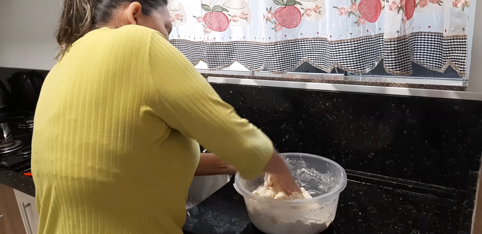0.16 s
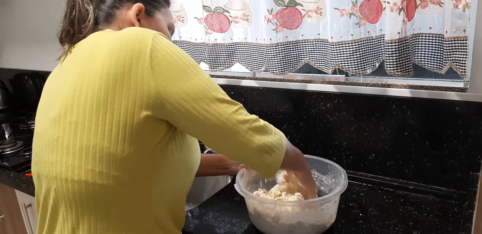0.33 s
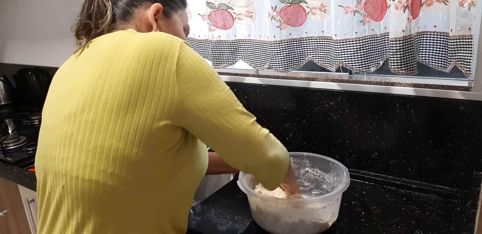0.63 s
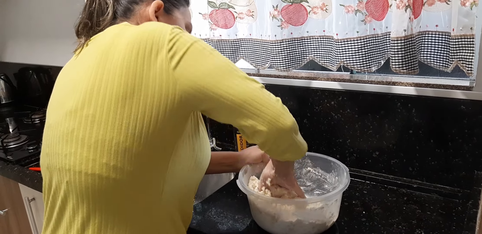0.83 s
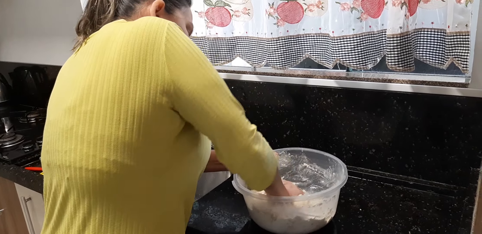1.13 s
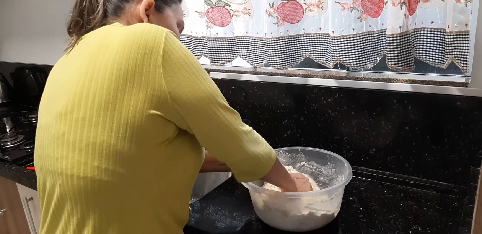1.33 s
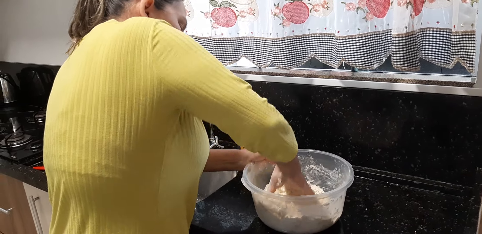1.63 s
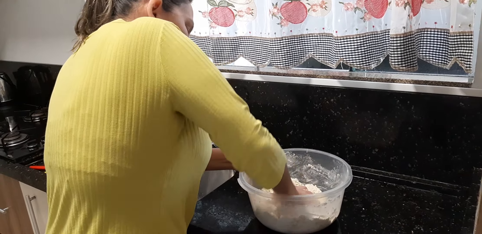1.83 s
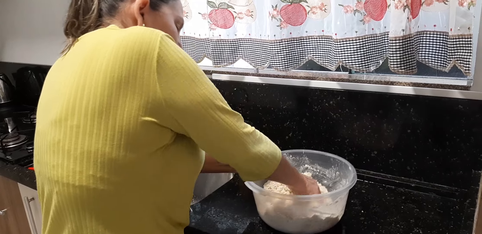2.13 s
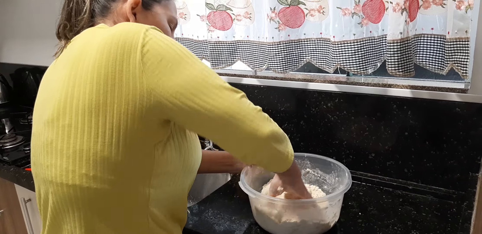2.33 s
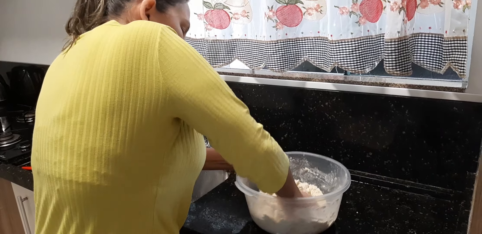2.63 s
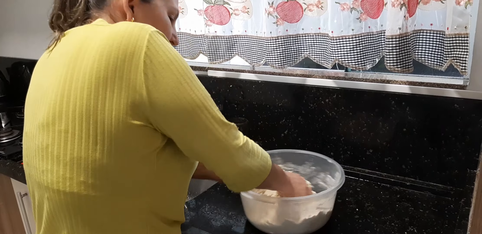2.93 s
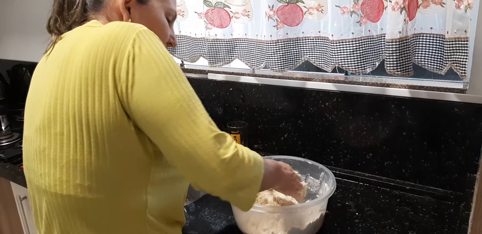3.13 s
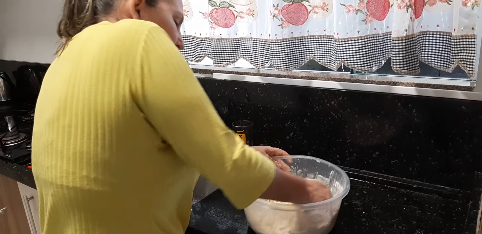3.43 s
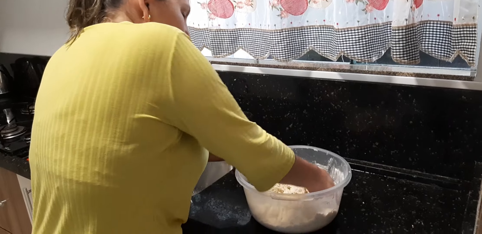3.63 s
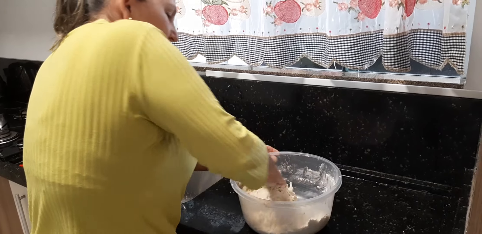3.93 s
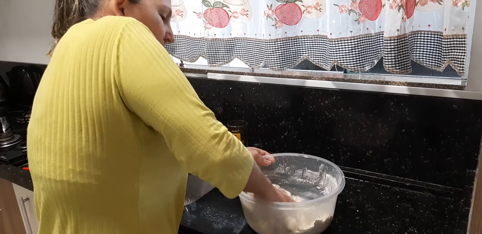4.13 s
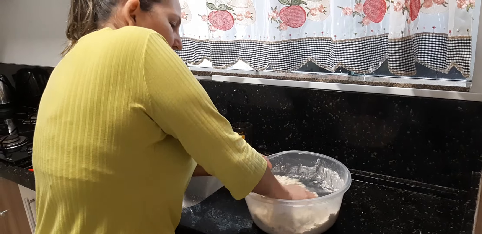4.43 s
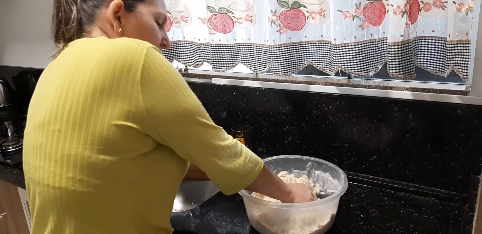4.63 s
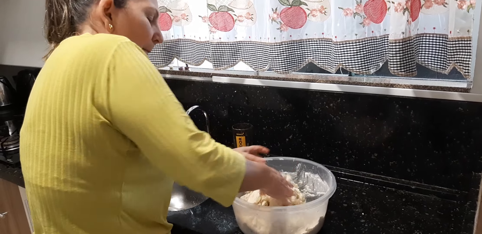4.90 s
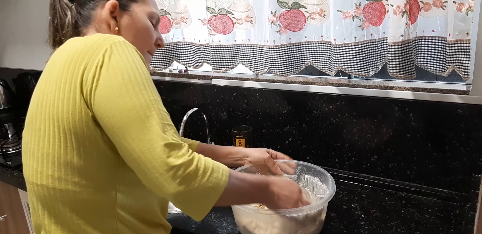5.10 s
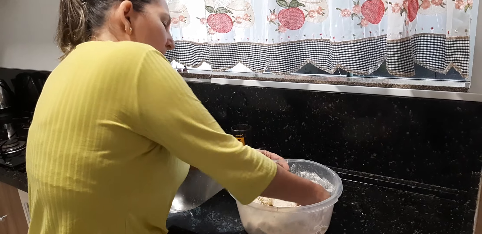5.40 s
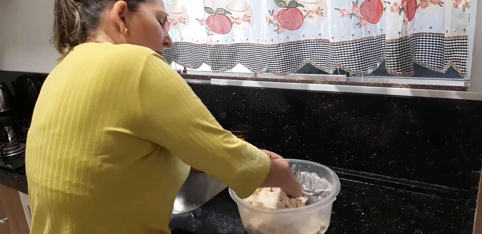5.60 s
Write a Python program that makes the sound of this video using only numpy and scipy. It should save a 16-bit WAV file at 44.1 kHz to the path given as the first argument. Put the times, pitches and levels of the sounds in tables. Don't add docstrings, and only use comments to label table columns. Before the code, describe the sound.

Close up, hands knead stiff, crumbly dough in a thin plastic bowl on a stone counter. A brief rub opens, then a small slap and tap at 0.4 s lead into a gritty push at 0.55 s. Around 1.0-1.2 s come firmer rasps, a few knuckle knocks and a dry snap. Lighter drags follow, with a push near 1.95 s and a soft dull slap at 2.5 s. A knock and scrape come at 3.0 s, then a heavy slap with clattering knocks, a thud and a tiny chink at 3.3 s. A strong push follows at 3.45-3.8 s, small taps at 4.0 s, a thud at 4.2 s and scraping to 4.9 s. The loudest knocks and bowl rock fall at 5.15-5.2 s, followed by dense crumbly rubs until about 5.65 s. Faint refrigerator hum and thin fan whine continue throughout, with short hard-walled kitchen reflections.

```python
import sys
import numpy as np
from scipy import signal
from scipy.io import wavfile
from scipy.ndimage import uniform_filter1d

SR = 44100
rng = np.random.default_rng(int(sys.argv[2]) if len(sys.argv) > 2 else 0)


def boost_factor(decibels):
    exponent = np.asarray(decibels, float) / 20
    return 10 ** exponent


def inscribe(sig):
    pcm = np.round(np.clip(np.atleast_2d(sig).T, -1, 1) * 32767)
    wavfile.write(sys.argv[1], SR, pcm.astype(np.int16))


N = 253883

# (frequency [Hz], density [dB per Hz])
RUB_COLOUR = [(300, -11), (480, -1), (750, -10), (1300, -3), (1900, -3), (2450, -1), (3000, -2.5),
              (4200, 1.5), (6700, -2), (7400, -6.5), (8200, -14.5), (9800, -15.5), (12000, -10),
              (13800, -12), (15400, -14)]
# (frequency [Hz], width [Hz], boost [dB])
BOWL_MODES = [(2365, 200, 1), (2500, 260, 2.5), (3640, 510, 1.5), (12160, 1100, 0), (7100, 330, 1.5),
              (1300, 160, 1)]
# (frequency [Hz], likeness [-1 to 1])
RUB_SAME = [(200, 1), (700, 0.88), (1200, 0.54), (1700, 0.), (2250, 0.83), (2800, 0.3), (3400, 0.18),
            (5000, 0), (15000, 0)]
# (frequency [Hz], left minus right [dB])
RUB_LEAN = [(300, -2.5), (700, 1.5), (1600, 3.5), (2400, -1.5), (3300, 2), (4100, 3.5), (5300, 1),
            (6300, 3.5), (7300, 9.5), (9000, 10.5), (11500, 8), (13200, 2.5), (15600, -1)]

# (start [s], length [s], force [dB], swell over the
# stroke [dB], floury hiss above force [dB])
STROKES = [(0.0, .01, -52.5, -0.5, -6), (.49, .05, -55.5, 3.5, -4), (0.548, .08, -49.5, -1, -1.5),
           (1.0, .07, -61, 4, -6), (1.081, .08, -55.5, 5.5, -0.5), (1.184, 0.087, -50, 3, -3.5),
           (1.908, 0.035, -59.5, 5, 2), (1.962, .11, -50.5, 1.5, -6), (2.854, 0.17, -52.5, 0, -7),
           (3.025, 0.066, -48.5, -0.5, -1.5), (3.443, 0.2, -51, 5.5, -3.5), (3.658, 0.14, -46, 1.5, -3),
           (4.348, 0.096, -50, 2.5, -3), (4.462, .18, -48, -2, -6), (5.205, 0.1, -48.5, 0.5, -6.5),
           (5.31, .08, -48.5, 3, -2.5), (5.394, 0.11, -46.5, -.5, 0.5), (5.556, 0.072, -45, 1, -3),
           (.1, .06, -61.5, -1.5, -11), (0.313, .02, -71, -4, 2), (0.439, .05, -54.5, -3, -8),
         (0.655, 0.097, -54.5, -2.5, -7), (.8, 0.056, -61, -3, -9), (.9, 0.25, -65, 3, -11),
         (1.36, .11, -56, 1.5, -9.5), (1.748, .13, -67.5, 2, -7), (2.14, .18, -57, -3.5, -8),
         (2.414, 0.12, -64, 0, -9), (2.688, 0.19, -54.5, 1, -9), (3.348, .085, -56.5, 5.5, -9),
         (3.89, .25, -52.5, -10, -7.5), (4.17, 0.19, -60, 2.5, -7), (4.668, .05, -52.5, -3, -8),
         (1.502, .1, -57.5, -9, -12), (3.122, 0.042, -51, -5.5, -5), (4.75, 0.074, -55, 1.5, -5),
         (4.848, .11, -56.5, 0, -9.5), (5.178, .025, -51, 3.5, -9.5)]
# (time [s], flexing [dB])
SLAPS = [
    (.39, -58.5),
    (2.532, -62.5),
    (3.311, -53.5),
    (3.33, -52.5),
    (5.148, -50),
]
# (time [s], level [dB])
LEAN_ON_WALL = [(0, -0.5), (.3, 1.5), (.42, 0.5), (.6, -1), (.72, -4), (.85, 1.5), (1.0, -2.5), (1.3, 2.5),
                (1.7, -1), (2.1, 0.5), (2.7, 0.5), (3.2, -0.5), (3.4, 2.5), (3.75, 0.5), (4.2, 3),
                (4.6, -0.5), (5.3, 0.5), (5.76, -.5)]

# (time [s], peak [dB], lower mode [Hz], upper mode [Hz], upper mode above lower [dB])
KNOCKS = [(0.389, -44, 1410, 2460, -3), (0.4246, -52, 1240, 2530, 11), (1.001, -49, 1320, 2130, -2),
          (1.1332, -41, 1510, 2500, -10), (2.9989, -40, 1010, 2330, -2), (3.309, -48, 1300, 2420, -17),
          (3.313, -38, 1500, 2280, -6), (3.3164, -38.5, 1340, 2210, -16), (3.3254, -44, 1440, 1970, 12),
          (3.3302, -40.5, 1820, 2020, 10), (3.991, -52.5, 1370, 2330, 19), (.845, -50, 1410, 2400, 6),
          (4.0435, -50, 1300, 2350, 8), (4.049, -46, 1300, 2350, 6), (5.23, -47, 1400, 2270, 6),
          (4.7937, -44, 1470, 2430, 6), (5.1444, -34.5, 1580, 2350, 3), (5.1524, -41, 1640, 2020, 9),
          (5.1596, -36, 1080, 1960, 0), (5.169, -46, 1350, 1980, 10), (5.188, -37, 1300, 2010, 0.1)]
# (time [s], peak [dB])
SNAPS = [
    (0.4242, -44),
    (1.1332, -44),
    (3.3145, -43),
    (4.217, -51),
    (5.187, -48),
]
# (time [s], peak [dB], frequency [Hz])
THUDS = [
    (1.089, -50, 207),
    (2.533, -41, 334),
    (3.316, -39, 215),
    (4.214, -42, 380),
    (5.186, -35.5, 417),
]
# (time [s], peak [dB], frequency [Hz])
CHINKS = [
    (0.3062, -55, 4930),
    (0.3134, -57, 5000),
    (3.3164, -47.5, 4430),
    (3.3174, -52, 3660),
    (5.284, -46.5, 3690),
]

# (frequency [Hz], density [dB per Hz])
AIR_COLOUR = [(400, 8), (700, 7), (1500, -5.5), (2250, 6), (3100, -2), (5000, -1.5), (6800, -8),
              (7500, -24), (8200, -17), (10200, -15.5), (11300, -8.5), (12900, -5), (13300, -26),
              (15400, -16.5)]
# (frequency [Hz], density [dB per Hz])
RUMBLE_COLOUR = [(20, -40), (36, -32), (50, -10), (72, -6.5), (90, -7), (105, -29), (120, -0.5), (200, 1),
                 (310, 0.5), (450, -5), (600, -11.5), (750, -15.5), (950, -13.5)]
# (frequency [Hz], likeness [-1 to 1])
AIR_SAME = [(60, 0.74), (150, 0.97), (380, 0.82), (950, 0.28), (2380, -0.38), (5980, -0.68), (15000, 0.15)]
# (frequency [Hz], left minus right [dB])
AIR_LEAN = [(60, 3), (300, 0.5), (1100, 4), (2300, 3), (3200, 1), (4200, 12), (5100, -5), (6500, 2),
            (7300, -3), (8200, 1), (10300, 14), (11300, 12), (12600, 4), (13300, -3), (15600, -7)]
# (frequency [Hz], width [Hz], boost [dB])
LEFT_PORT_BUMPS = [(11170, 540, 7), (12950, 200, 4), (9300, 240, 6), (3720, 440, 11)]
# (frequency [Hz], wander [Hz], level [dB rms], unsteadiness [0-1])
FRIDGE_HUM = [(60.4, 14.5, -67, 0.93), (121, 27, -67.5, 0.54), (200.8, 5, -68, 0.69)]
# (frequency [Hz], wander [Hz], level [dB rms], unsteadiness [0-1])
FAN_WHINE = (3626, 6, -75, .35)
# (frequency [Hz], t60 [s])
KITCHEN_T60 = [(200, 0.44), (1000, 0.69), (4000, 0.26), (12000, 0.086)]

TOP_HZ, EDGE_HZ = 15500, 15740
AIR_DB, RUMBLE_DB = -66, -57
RISE_DB_PER_S, FALL_DB_PER_S, REST_DB, REST_HISS_DB = 244, 107, -71.5, -7
HISS_FADE_DB_PER_S = 33
FIRM_DB, RING_DB, RING_FOLLOWS, FLEX_DB, FLEX_FOLLOWS = -50, -4, 0.79, -6.5, 0.64
SLAP_RING_DB, SLAP_SCRAPE_DB = 1, -3
SLAP_RISE_DB_PER_S, SLAP_FALL_DB_PER_S = 2500, 150
CRACK_DB = -14


def evened(x):
    return x / np.sqrt(np.mean(x ** 2) + 1e-20)


def read(points, hz):
    f, value = np.transpose(points)
    return np.interp(np.log(np.minimum(hz, TOP_HZ) + 1), np.log(f + 1), value)


def bumps(peaks, hz):
    return sum(db / (1 + (2 * (hz - f) / width) ** 2) for f, width, db in peaks)


def patches(shape, wide, long):
    over_hz = uniform_filter1d(rng.standard_normal(shape), round(wide), 0)
    return evened(uniform_filter1d(over_hz, round(long), 1))


def two_ports(pair, hz, same, lean):
    likeness = np.clip(read(same, hz), -1, 1)[:, None]
    half_db = read(lean, hz)[:, None] / 2
    right = likeness * pair[0] + np.sqrt(1 - likeness ** 2) * pair[1]
    return np.array([pair[0] * boost_factor(half_db), right * boost_factor(-half_db)])


def stroke(now, start, length, force_db, swell_db, rise=RISE_DB_PER_S, fall=FALL_DB_PER_S):
    held = force_db + swell_db * np.clip((now - start) / max(length, 1e-3), 0, 1)
    return held - rise * np.maximum(start - now, 0) - fall * np.maximum(now - start - length, 0)


def hand(now):
    rows = np.array(STROKES)
    force = np.maximum(np.max([stroke(now, *row[:-1]) for row in rows], 0), REST_DB)
    hiss_fall = FALL_DB_PER_S + HISS_FADE_DB_PER_S
    dust = [stroke(now, *row[:-1], fall=hiss_fall) + row[-1] for row in rows]
    hiss = np.maximum(np.max(dust, 0), REST_DB + REST_HISS_DB)
    slaps = [stroke(now, s, 0, db, 0, SLAP_RISE_DB_PER_S, SLAP_FALL_DB_PER_S) for s, db in SLAPS]
    slap = np.max(slaps, 0)
    wall = FIRM_DB + np.interp(now, *np.transpose(LEAN_ON_WALL))
    flex = np.maximum(wall + FLEX_DB + FLEX_FOLLOWS * (force - FIRM_DB), slap)
    ringing = np.maximum(wall + RING_DB + RING_FOLLOWS * (force - FIRM_DB), slap + SLAP_RING_DB)
    scrape = np.maximum(force, slap + SLAP_SCRAPE_DB)
    return flex, ringing, scrape, hiss


def rubbing(slips_per_s=26000, spread_db=1.6, patchy_db=1.1, judder_db=.4):
    size_db = spread_db * np.minimum(rng.exponential(1, (2, N)), 3)
    size = boost_factor(size_db) * rng.choice([-1., 1.], (2, N))
    slips = size * (rng.random((2, N)) < slips_per_s / SR)
    hz, t, z = signal.stft(slips, SR, nperseg=512, noverlap=384)
    colour_db = read(RUB_COLOUR, hz) + bumps(BOWL_MODES, hz)
    patch_db = patchy_db * patches(z.shape[1:], 8, 15.5)
    z = two_ports(z, hz, RUB_SAME, RUB_LEAN) * boost_factor(colour_db[:, None] + patch_db)

    below = [1 / (1 + (hz / edge) ** 16) for edge in (1950, 2950, 7700)]
    shares = below[0], below[1] - below[0], below[2] - below[1], 1 - below[2]
    judder = judder_db * evened(uniform_filter1d(rng.standard_normal(N), 1500))
    out, steps = np.zeros((2, N)), np.arange(0, N + 64, 64)
    for share, level_db in zip(shares, hand(steps / SR)):
        part = signal.istft(z * share[:, None], SR, nperseg=512, noverlap=384)[1][:, :N]
        drive_db = np.interp(np.arange(N), steps, level_db) + judder
        out += part / part.mean(0).std() * boost_factor(drive_db)
    return out


def air(shape, level_db, patchy_db):
    hz, t, z = signal.stft(rng.standard_normal((2, N)), SR, nperseg=4096, noverlap=3072)
    patch_db = patchy_db * patches(z.shape[1:], 19.6, 4)
    z = two_ports(z, hz, AIR_SAME, AIR_LEAN) * boost_factor(read(shape, hz)[:, None] + patch_db)
    z = z * boost_factor(np.array([bumps(LEFT_PORT_BUMPS, hz), 0 * hz]))[:, :, None]
    out = signal.istft(z, SR, nperseg=4096, noverlap=3072)[1][:, :N]
    return boost_factor(level_db) * out / out.mean(0).std()


def fridge():
    t, out = np.arange(N) / SR, np.zeros((2, N))
    for hz, width, db, unsteady in [*FRIDGE_HUM, FAN_WHINE]:
        r = np.exp(-np.pi * width / SR)
        waver = rng.standard_normal(N) + 1j * rng.standard_normal(N)
        for _ in range(2):
            waver = signal.lfilter([1 - r], [1, -r], waver)
        tone = (1 - unsteady + unsteady * waver / np.std(waver)) * np.exp(2j * np.pi * hz * t)
        lean_db = .8 if hz < 1000 else 3.5
        out += boost_factor(db) * evened(tone.real) * boost_factor(np.array([[lean_db], [-lean_db]]))
    return out


def kitchen(x):
    taps = np.zeros((2, SR // 2))
    starts = np.arange(200, SR // 2 - 20, 20)
    at = starts + rng.integers(0, 20, (2, len(starts)))
    np.put_along_axis(taps, at, rng.choice([-1., 1.], at.shape), 1)
    hz, t, z = signal.stft(taps, SR, nperseg=256)
    decay = boost_factor(-60 * t / read(KITCHEN_T60, hz)[:, None])
    tail = signal.istft(z * decay, SR, nperseg=256)[1]
    return signal.fftconvolve(x, tail / np.linalg.norm(tail[0]), axes=1)[:, :N]


def add(mix, s, sound):
    part = mix[:, round(s * SR):][:, :sound.shape[1]]
    part += sound[:, :part.shape[1]]


def ring(hz, t60, rise=0.00036):
    t = np.arange(round(SR / 5)) / SR
    return boost_factor(-60 * t / t60) * (1 - np.exp(-t / rise)) * np.sin(2 * np.pi * hz * t) * (t < .19)


def knocks(lean_db=3.0):
    out = np.zeros((2, N))
    sides, centre = boost_factor(np.array([[lean_db / 2], [-lean_db / 2]])), np.ones((2, 1))
    breaks = [(row[0], row[1] + CRACK_DB) for row in KNOCKS] + list(SNAPS)
    crack_band = signal.butter(2, (3300, 6500), "band", fs=SR, output="sos")
    cracks = signal.sosfilt(crack_band, rng.standard_normal((len(breaks), 400)))
    for (s, db), crack in zip(breaks, cracks):
        dying_db = db - 60 * np.arange(len(crack)) / SR / 0.041
        add(out, s, crack * boost_factor(dying_db) * sides)
    for s, db, low_hz, high_hz, upper_db in KNOCKS:
        lower = boost_factor(-upper_db / 2) * ring(low_hz, 0.014, 0.00064)
        upper = boost_factor(upper_db / 2 + 1.5) * ring(high_hz, 0.026, .001)
        add(out, s, boost_factor(db) * (lower + upper) * sides)
    for s, db, hz in THUDS:
        thud = ring(hz, 0.032, 0.002) + 0.47 * ring(1.96 * hz, 0.017)
        add(out, s, boost_factor(db + 2.5) * thud * centre)
    for s, db, hz in CHINKS:
        add(out, s, boost_factor(db + 7) * ring(hz, 0.013) * centre)
    return out


def scene():
    rub, hits = rubbing(), knocks()
    rumble = air([*RUMBLE_COLOUR, (1500, -93)], RUMBLE_DB, 0.4)
    tone = rumble + air(AIR_COLOUR, AIR_DB, 0.94) + fridge()
    close = boost_factor(-1.0) * rub + hits
    reflected = boost_factor(-15.0) * kitchen(rub) + boost_factor(-7.5) * kitchen(hits)
    return close + reflected + tone


def roll_off(x):
    return signal.sosfilt(signal.butter(12, 16260, fs=SR, output="sos"), x)


def record(dry):
    limit = signal.firwin(2047, EDGE_HZ, window=("kaiser", 10), fs=SR)
    mix = signal.oaconvolve(dry, limit[None], "same", axes=1)
    return roll_off(mix)


dry = scene()
out = record(dry)
inscribe(out)
```